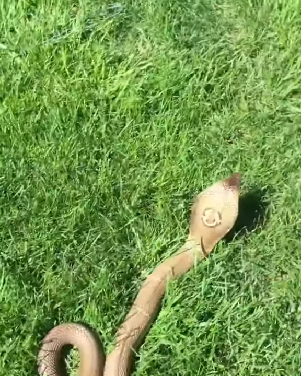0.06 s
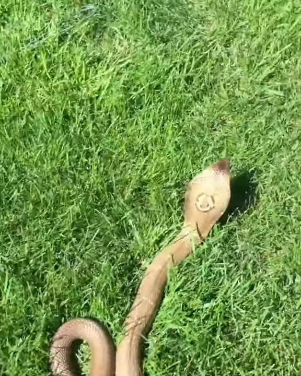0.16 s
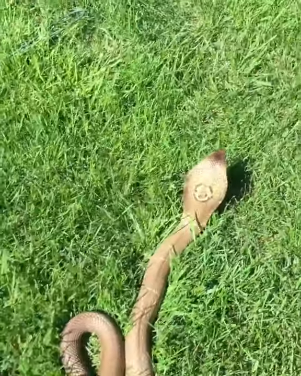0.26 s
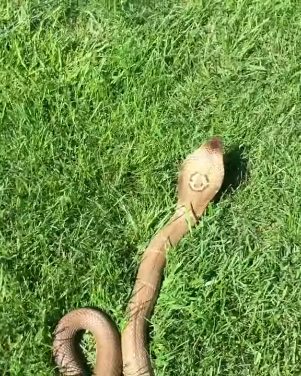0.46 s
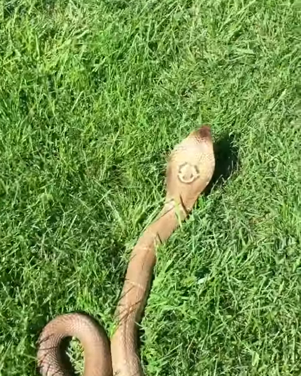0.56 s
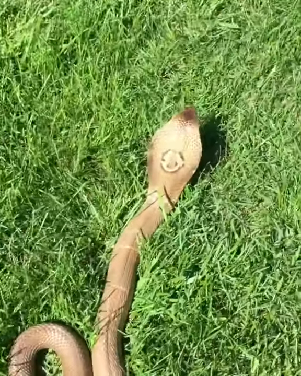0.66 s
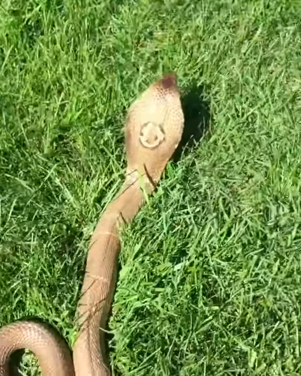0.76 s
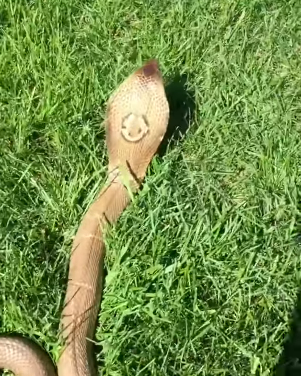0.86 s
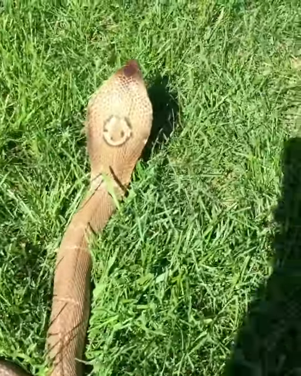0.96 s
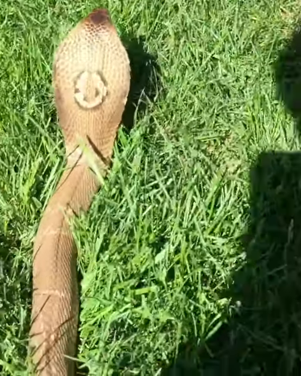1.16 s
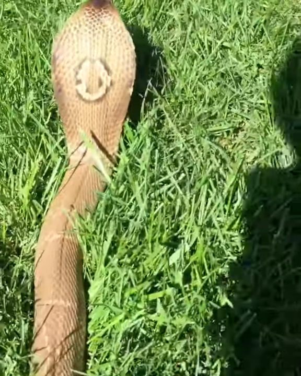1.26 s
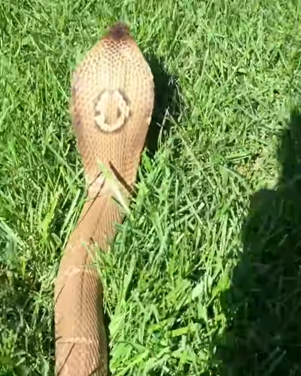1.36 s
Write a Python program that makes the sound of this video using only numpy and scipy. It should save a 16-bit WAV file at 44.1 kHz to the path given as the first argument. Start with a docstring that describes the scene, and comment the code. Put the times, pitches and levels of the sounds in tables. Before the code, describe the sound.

A snake gives one soft, breathy hiss amid wind buffets and faint grass rustling.

```python
"""A cobra slides over a lawn and gives one soft, breathy hiss.
Faint outdoor noise and a low breeze run throughout, and a hand makes a dull bump at the start.
Scales swish through the grass from the first moment, and blades tick as they flick free.
Wind buffets the microphone in a short gust; as it peaks, the snake pushes air through its airway
to hiss, with a weaker after-puff. A few puffs of wind and more swishes follow."""
import sys
import numpy as np
from scipy import signal
from scipy.fft import rfft, irfft
from scipy.io import wavfile
from scipy.ndimage import uniform_filter1d

SR = 44100
rng = np.random.default_rng(int(sys.argv[2]) if len(sys.argv) > 2 else 0)


def inscribe(sig):
    """Save sig as 16-bit PCM at rate SR to the path in sys.argv[1].

    A 1-D sig is mono; a 2-D sig holds one channel per row.
    Samples are clipped to [-1, 1] before scaling.
    """
    pcm = np.round(np.clip(np.atleast_2d(sig).T, -1, 1) * 32767)
    wavfile.write(sys.argv[1], SR, pcm.astype(np.int16))


N = 61739


def undb(db):
    """Turn decibels into a number to multiply a sound by."""
    return 10 ** (np.asarray(db) / 20)


def unit(x):
    """Scale a signal so its average strength (rms) is 1."""
    return x / np.sqrt(np.mean(x ** 2))


def noise(points):
    """Noise of strength 1 whose tone follows (pitch_hz, relative_db) points."""
    hz, db = np.array(points, float).T
    freqs = np.maximum(np.fft.rfftfreq(N, 1 / SR), 1)
    gain = undb(np.interp(np.log(freqs), np.log(hz), db))
    return unit(irfft(rfft(rng.standard_normal(N)) * gain, N))


def ring(x, hz, width):
    """A resonance: keep the sound near one pitch and weaken the rest."""
    return signal.lfilter(*signal.iirpeak(min(hz, SR / 2 - 1), hz / width, fs=SR), x)


def walk(rate):
    """A random wander of strength 1 that glides to a new value `rate` times a second."""
    step = int(SR / rate)
    stairs = np.repeat(rng.standard_normal(N // step + 1), step)
    return unit(uniform_filter1d(stairs, step)[:N])


def swell(t, centre, half_width):
    """A bell-shaped rise and fall."""
    return np.exp(-((t - centre) / half_width) ** 2)


def outdoors(t):
    """Distant open-air noise fades slowly over a faint low drone."""
    # Tone of the open air: pitch_hz, relative_db
    air_tone = [(100, 8.5), (300, 6), (480, 2.5), (800, 1.5), (1250, 1), (2200, -7), (4000, -12.5),
                (8000, -20.5), (10500, -23.5), (13000, -22), (16000, -14.5)]
    drone_hz, width_hz, drone_db = 220.8, 33, -65
    drone = unit(ring(ring(rng.standard_normal(N), drone_hz, width_hz), drone_hz, width_hz))
    air_db = -62 - 3 * t + .5 * walk(5.5)
    return undb(air_db) * noise(air_tone) + undb(drone_db) * drone


def wind(t):
    """Small swirls of air suck at the microphone; gusts and a steady breeze rumble around them."""
    # Swirls that hit the microphone: peak_s, half_width_s, suction_db
    swirls = [(0.2321, 0.0013, -23), (.2372, 0.00054, -29.5), (0.24, .0015, -19.5), (0.252, 0.0026, -16.5),
              (0.278, 0.0023, -20), (0.356, 0.0019, -24.5), (0.3691, 0.0023, -21), (0.3994, 0.0019, -22),
              (0.412, 0.0075, -14.5), (.4468, 0.0017, -19), (0.5004, 0.0043, -31), (0.613, 0.0069, -40),
              (0.707, 0.0035, -28), (0.8245, 0.0023, -27.5)]
    # Gusts of wind: start_s, length_s, level_db
    gusts = [(.003, .060, -53), (.125, .075, -54), (.238, .055, -43), (.293, .062, -42.5),
             (.357, .110, -39.5), (.494, .050, -41.5), (.590, .045, -50), (.702, .036, -47),
             (.995, .025, -55), (1.345, .060, -52)]
    # Tone of the churning air in a gust: pitch_hz, relative_db
    gust_tone = [(22, -43), (42, -1.5), (65, 0), (105, -3), (150, -10.5), (230, -21.5), (400, -33),
                 (800, -70)]
    # Tone of the breeze: pitch_hz, relative_db
    breeze_tone = [(20, -20), (45, 2), (72, 4.5), (110, -0.5), (170, -2), (260, -11), (380, -17),
                   (700, -35.5)]
    bass_cut_hz, ramp_s = 63, .010
    suction = -sum(undb(db) * swell(t, at, half_width) for at, half_width, db in swirls)
    # The microphone loses the deepest bass of each thump.
    thumps = signal.sosfilt(signal.butter(2, bass_cut_hz, "high", fs=SR, output="sos"), suction)
    force = sum(undb(db) * np.clip(np.minimum(t - at, at + length - t) / ramp_s + .5, 0, 1)
                for at, length, db in gusts)
    rumble = force * noise(gust_tone)
    breeze_db = -58.5 + 1.2 * walk(10.9)
    return thumps + rumble + undb(breeze_db) * noise(breeze_tone)


def hand_bump(t):
    """A moving hand makes a soft, dull bump: a short low ring with a scuff."""
    # The bump: start_s, pitch_hz, decay_s, level_db
    bump = (.006, 255, .015, -42.5)
    at, hz, decay, db = bump
    rise_s = .004
    age = np.maximum(t - at, 0)
    loudness = undb(db) * np.minimum(age / rise_s, 1) * np.exp(-age / decay)
    scuff = unit(ring(ring(rng.standard_normal(N), hz=400, width=210), hz=400, width=220))
    return loudness * (np.sin(2 * np.pi * hz * age) + .35 * scuff)


def grass_swishes(t):
    """Scales brush through the blades in swishes, with a fine crackle inside."""
    # Strokes of scales on grass: peak_s, rise_s, fall_s, rub_db, body_db
    swishes = [(0.038, 0.15, 0.021, -66.5, -68), (.160, 0.24, 0.059, -68.5, -72.5),
               (0.305, 0.02, 0.0073, -67, -68), (.545, 0.13, 0.046, -70, -74),
               (0.634, 0.086, 0.07, -64, -67.5), (0.812, 0.042, 0.08, -74, -68),
               (0.959, 0.059, 0.036, -67, -68), (1.295, 0.04, 0.24, -72, -70.5)]
    # Tone of the bright rubbing: pitch_hz, relative_db
    rub_tone = [(1000, -24), (2500, 3.5), (4500, -1.5), (7500, 0.5), (9000, 2.5), (10500, -1), (12500, 4),
                (16000, -4)]
    # Tone of the lower body of a swish: pitch_hz, relative_db
    body_tone = [(150, -37), (350, -31), (600, 12), (1100, 8.5), (1700, -17), (3000, -13), (6000, -3),
                 (15000, -38)]
    crackles_per_s, crackle_relative_db = 170, -13.5
    rub_gain, body_gain = 0, 0
    for at, rise, fall, rub_db, body_db in swishes:
        stroke = swell(t, at, np.where(t < at, rise, fall))
        rub_gain += undb(rub_db) * stroke
        body_gain += undb(body_db) * stroke
    clicks = (rng.random(N) < crackles_per_s / SR) * rng.standard_normal(N)
    crackle = undb(crackle_relative_db) * unit(ring(clicks, hz=11000, width=8000))
    rub = noise(rub_tone) * undb(0.54 * walk(120))
    return rub_gain * (rub + crackle) + body_gain * noise(body_tone)


def grass_ticks(t):
    """Single blades and stalks let go with a snap and a very short scrape."""
    # Blades that flick and stalks that snap: start_s, pitch_hz, width_hz, peak_db
    ticks = [(0.044, 13000, 8000, -47), (0.081, 12000, 7000, -48), (0.0984, 2450, 1680, -43),
             (0.1093, 2420, 1547, -44), (.1380, 12500, 7950, -53), (0.15, 11000, 7000, -50),
             (.1608, 8500, 9000, -48), (0.197, 12400, 8100, -45.5), (0.3618, 6000, 9900, -42.5),
             (1.2225, 12500, 8000, -55)]
    scrape_gain, decay_s = .16, .0012
    out = np.zeros(N)
    for at, hz, width, db in ticks:
        fade = (t >= at) * np.exp(-np.abs(t - at) / decay_s)
        crack = scrape_gain * rng.standard_normal(N) * fade
        crack[int(at * SR)] = 1  # the snap itself
        tick = ring(ring(crack, hz, width), hz, width)
        out += undb(db) * tick / np.abs(tick).max()
    return out


def hiss(t):
    """Air pushed through the snake's airway swells, holds and fades, fluttering a little."""
    # Resonances of the airway: pitch_hz, base_width_hz, relative_db
    airway = [(420, 123, 2.5), (851, 130, 1), (1166, 360, -1), (1444, 280, -3.5), (1710, 350, -10),
              (2940, 770, -14.5), (3840, 1600, -15)]
    # One push of air and a weaker after-puff: start_s, rise_s, hold_s, fall_s, level_db
    pushes = [(0.416, 0.074, 0.16, 0.048, -61), (0.68, 0.014, 0.027, 0.079, -62)]
    widen, flutter_db = 1.1, 1.0
    breath, flow = 0, 0
    for hz, width, db in airway:
        band = ring(rng.standard_normal(N), hz, widen * width)
        breath += undb(db) * ring(band, hz, widen * width)
    for at, rise, hold, fall, db in pushes:
        rising = (t - at) / rise
        falling = 1 - (t - at - rise - hold) / fall
        flow += undb(db) * np.clip(np.minimum(rising, falling), 0, 1)
    return unit(breath) * flow * undb(flutter_db * walk(33.8))


def scene():
    """All the sounds add up at one microphone."""
    t = np.arange(N) / SR
    return (outdoors(t) + wind(t) + hand_bump(t) + grass_swishes(t) + grass_ticks(t) + hiss(t))[None]


def record(dry):
    """The recorder drops the deepest rumble and the highest treble."""
    low_hz, top_hz = 38, 15260
    x = signal.sosfilt(signal.butter(2, low_hz, "high", fs=SR, output="sos"), dry)
    return signal.sosfilt(signal.ellip(14, .2, 60, top_hz, fs=SR, output="sos"), x)


dry = scene()
out = record(dry)
inscribe(out)
```